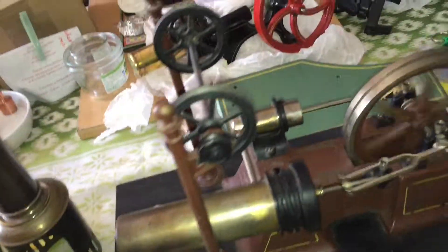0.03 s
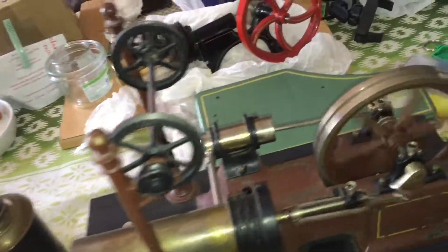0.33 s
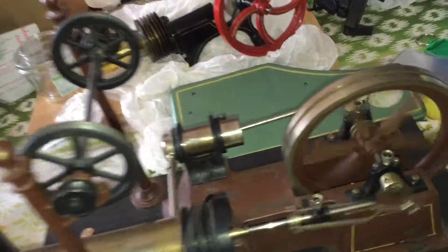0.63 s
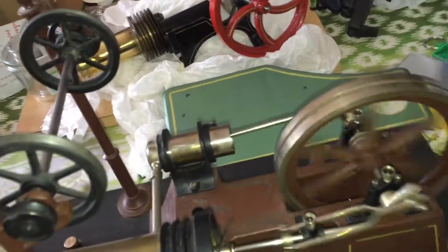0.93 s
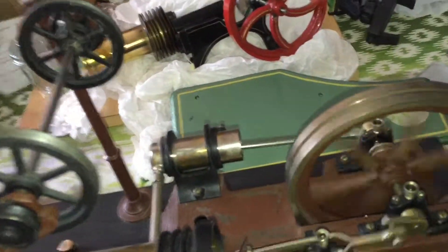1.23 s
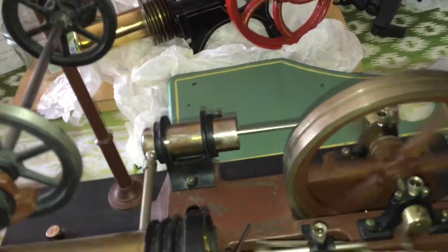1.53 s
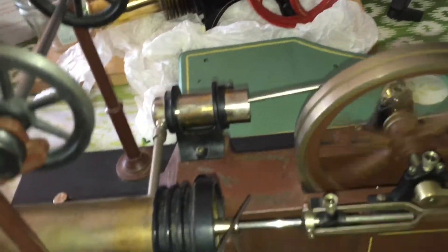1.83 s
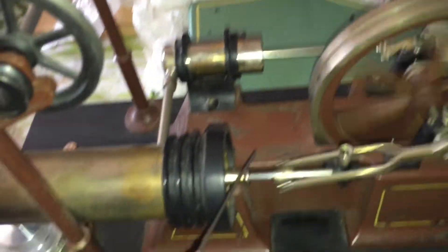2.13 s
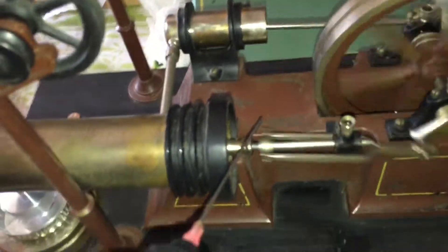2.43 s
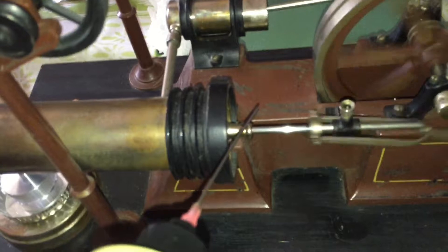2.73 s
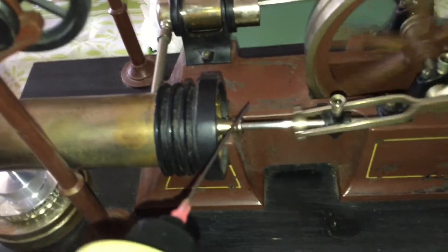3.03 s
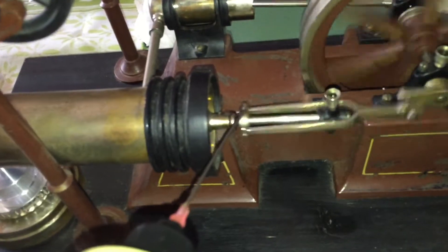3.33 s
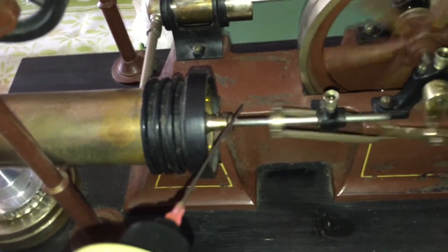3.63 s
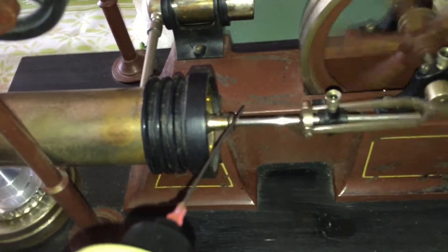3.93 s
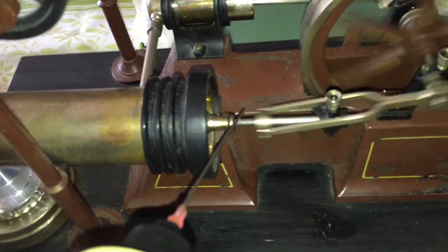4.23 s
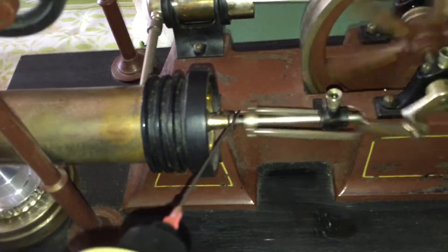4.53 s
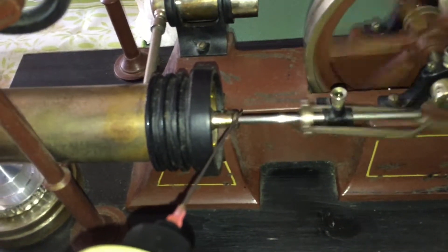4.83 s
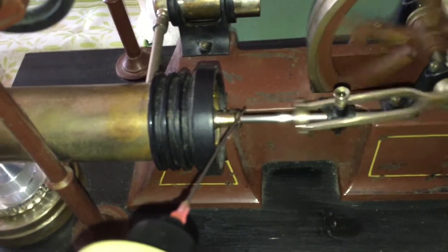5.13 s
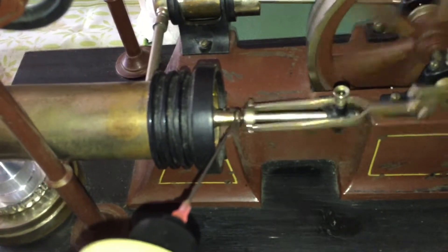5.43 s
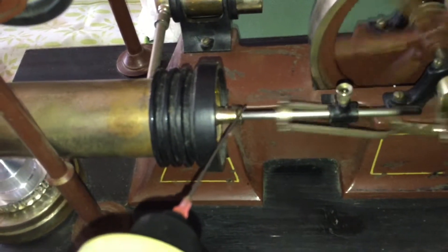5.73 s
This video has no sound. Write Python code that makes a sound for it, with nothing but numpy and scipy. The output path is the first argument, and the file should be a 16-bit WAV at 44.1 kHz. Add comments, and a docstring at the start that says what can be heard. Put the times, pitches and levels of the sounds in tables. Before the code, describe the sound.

A small model engine runs steadily indoors with sharp, rhythmic metal clacks and a faint squeak on every turn.

```python
"""Model hot air engine on a table.

Close by, indoors, at about 143 turns a minute. Linkage slack knocks twice a turn, harder on the back
stroke; each knock rattles the frame and thumps the base. A dry slide sticks and slips, squeaking once
a turn. Joints scuff and tick, bearings chirp and whisper, and one dry ping sounds near the end."""
import sys
import numpy as np
from scipy import signal
from scipy.fft import rfft, irfft
from scipy.io import wavfile
from scipy.ndimage import uniform_filter1d

SR = 44100
rng = np.random.default_rng(int(sys.argv[2]) if len(sys.argv) > 2 else 0)


def inscribe(sig):
    """Save sig as 16-bit PCM at rate SR to the path in sys.argv[1].

    A 1-D sig is mono; a 2-D sig holds one channel per row.
    Samples are clipped to [-1, 1] before scaling.
    """
    pcm = np.round(np.clip(np.atleast_2d(sig).T, -1, 1) * 32767)
    wavfile.write(sys.argv[1], SR, pcm.astype(np.int16))


N = 254456


# flywheel: (time [s], speed [turns/min])
SPEED = [(.8, 143.33), (2, 142.41), (3.9, 142.21), (4.6, 143.85)]

def flywheel(first_knock_s=.155):
    """Time and turns made since the first out knock, with a second to spare at each end."""
    t = np.arange(-SR, N + SR) / SR
    turns = np.cumsum(follow(SPEED, t)) / (60 * SR)
    return t, turns - np.interp(first_knock_s, t, turns)


# back knock after the out knock: (time [s], angle [turns])
BACK_ANGLE = [(1, .4456), (3.7, .4548), (4.5, .4559)]

def knock_times():
    """Out and back knocks each fall at their own flywheel angle."""
    t, turns = flywheel()
    whole = np.arange(-1, np.interp(N / SR, t, turns))
    outs = np.interp(whole, turns, t)
    backs = np.interp(whole + follow(BACK_ANGLE, outs), turns, t)
    return outs[1:], backs


# knock strength per stroke: (time [s], relative level [dB])
OUT_FORCE = [(.15, -34), (.57, -38.5), (1, -35), (2.25, -33.7), (3.9, -35.5), (4.4, -33.5), (5.6, -35)]
BACK_FORCE = [(.3, -32), (2, -30.3), (2.8, -31), (4.099, -29.5), (4.7, -31), (5.4, -28.8)]
# brighter as the microphone moves in: (time [s], treble gain [dB])
BRIGHTNESS = [(.5, -1.6), (2.2, -1.2), (3.3, 1.2), (4.9, 1.6), (5.6, -1.8)]
# load on the base: (time [s], thump gain [dB])
BASE_LOAD = [(.2, -1.8), (1, 0), (3.8, 1), (5.5, 0)]

def strokes(times, force, thump_db, rattle_s):
    """One row a knock: (time [s], level [dB], treble gain [dB], thump gain [dB], rattle length [s])."""
    thump_scatter, rattle_scatter = rng.standard_normal((len(times), 2)).T
    load_db = thump_db + follow(BASE_LOAD, times) + .5 * thump_scatter
    length_s = rattle_s * np.exp(.15 * rattle_scatter)
    return np.transpose([times, follow(force, times), follow(BRIGHTNESS, times), load_db, length_s])


# frame and rod modes: (frequency [Hz], t60 [s], out level [dB], back level [dB])
FRAME_MODES = [(555, .09, -28, -17), (615, .11, -25, -4), (780, .05, -5, -2), (880, .055, -3, 4),
               (935, .06, -4, -1), (997, .07, -2, -3), (1098, .08, -17, -5), (1220, .07, -9, -7),
               (1333, .07, -7, -6), (1690, .025, -8, -7), (1815, .055, -15, -4), (2340, .05, -2, 0),
               (2640, .05, -2, 2), (2865, .06, -3, 0), (3200, .035, -5, -3), (3390, .06, -2, 2),
               (3490, .05, -3, -2), (3752, .07, -9, -7), (3880, .05, -9, -8), (4480, .035, -9, -9),
               (5170, .03, -13, -11), (5390, .22, -27, -17), (6480, .022, -8, -8), (7890, .025, -12, -22),
               (9020, .025, -5, -7), (9350, .025, -7, -9), (9950, .014, -13, -3), (10750, .02, -18, -11),
               (13040, .07, -25, -22)]
# dense, damped modes between them: (frequency [Hz], out density [dB], back density [dB])
CLATTER = [(278, -37, -32.5), (530, -12.5, -8), (733, -2, 2.5), (1090, -3, 3), (1490, 1, 0),
           (2700, -0.5, 3), (3260, 0, 0), (4300, -10, -7.5), (7000, -11, -10.5), (7960, -13.5, -17),
           (9680, -11.5, -8), (11500, -21.5, -10), (12800, -17, -17.5), (15800, -42, -22)]

def knocks(rows, side, clatter_db, clatter_t60_s, touch_db, touch_lead_s, load_detune=.006):
    """A joint touches lightly, then strikes the frame; load shifts the modes. Side 0 is out, 1 back."""
    out, t = np.zeros(N), clock(.16)
    spectrum = np.array(CLATTER)[:, [0, 1 + side]]
    for s, db, treble_db, _, rattle_s in rows:
        swell = np.minimum(t / (.62 * rattle_s), 1)  # bounces pump the modes up
        scatter = rng.standard_normal((len(FRAME_MODES), 3))
        ring = np.zeros(len(t))
        for (hz, t60, *side_db), (stray_db, cycles, detune) in zip(FRAME_MODES, scatter):
            partial = mode(t + abs(cycles) / hz, hz * (1 + load_detune * detune), t60)
            ring += amp(side_db[side] + stray_db) * unit(swell * partial)
        dense = colour(rng.standard_normal(len(t)) * decay(t, clatter_t60_s), spectrum)
        clatter = unit(signal.fftconvolve(dense, rattle(rattle_s, bounces=9))[:len(t)])
        blow = unit(unit(ring) + amp(clatter_db) * clatter)
        blow = colour(blow, [(3800, 0), (7000, treble_db)]) * np.sqrt(.013 * SR)
        add(out, s, amp(db + 1) * blow)
        touch = signal.fftconvolve(dense, rattle(touch_lead_s, bounces=14))
        touch = colour(touch, [(900, -7.5), (2300, -3), (4000, -5), (10000, -9)])
        add(out, s - touch_lead_s, amp(db + touch_db) * unit(touch) * np.sqrt(.017 * SR))
    return out


def rattle(length_s, bounces):
    """Force of a joint chattering home: one blow, then scattered bounces."""
    force = np.zeros(len(clock(length_s)))
    at = rng.integers(0, len(force), bounces)
    force[at] = rng.standard_normal(bounces) * (1 - .5 * at / len(force))
    force[0] = 1.29
    return force


# rubs around the knock: (delay [s], gain [dB], decay time [s], brightness [dB])
BACK_SCUFFS = [(-.03, -27.5, 0.017, -4), (0.079, -28.5, 0.017, 4.5)]

def back_stroke(rows):
    """The harder knock, with a clear first touch."""
    blows = knocks(rows, side=1, clatter_db=2.5, clatter_t60_s=.04, touch_db=-14.5, touch_lead_s=.0087)
    return blows + scuffs(rows, BACK_SCUFFS)


# slack take-up: (time [s], relative level [dB])
SLACK_LEVEL = [(.3, -50), (1.8, -42), (3.05, -41), (3.5, -46.3), (5.15, -49), (5.57, -40.5)]
# its rubs: (delay [s], gain [dB], decay time [s], brightness [dB])
OUT_SCUFFS = [(0, -7, 0.0091, 1), (.006, -4.5, 0.012, -4), (0.021, -18, .016, 4.5), (.032, -12, 0.013, 3.5)]

def out_stroke(rows, slack_lead_s=.0432):
    """The rod scuffs as it takes up its slack, then gives the lighter knock."""
    blows = knocks(rows, side=0, clatter_db=1.5, clatter_t60_s=.026, touch_db=-21, touch_lead_s=.005)
    slack_s = rows[:, 0] - slack_lead_s
    return blows + scuffs(zip(slack_s, follow(SLACK_LEVEL, slack_s)), OUT_SCUFFS)


# base and table modes: (frequency [Hz], t60 [s], level [dB])
BASE_MODES = [(88, 0.058, -11.5), (146.8, 0.16, -1.2), (159.9, 0.11, -1.5), (188, .15, -0.35),
              (299.7, 0.049, 7.5), (367.5, 0.11, 7.5), (388.3, 0.098, 5.5)]
# pushes on the base: (delay [s], relative level [dB], contact time [s])
OUT_PUSHES = [(-.0412, -44, 0.0045), (-.0147, -42, 0.0046), (-.0005, -45.5, 0.002), (.006, -47.5, 0.0007)]
BACK_PUSHES = [(-.0187, -61, 0.0032), (-.0027, -41.5, .0036), (.0065, -48.5, 0.0015), (0.025, -48.5, 0.004),
               (0.047, -50.5, .0048)]

def thumps(rows, pushes, jitter_s=.00023, attack_s=.0031):
    """Moving parts push on the base and ring it; longer contact gives a duller thump."""
    force, t = np.zeros(N), clock(.3)
    for s, _, _, load_db, _ in rows:
        for delay_s, db, contact_s in pushes:
            push = np.hanning(len(clock(contact_s)))
            start_s = s + delay_s + jitter_s * rng.standard_normal()
            add(force, start_s, amp(db + load_db + rng.standard_normal()) * push / push.sum())
    ring = sum(amp(db) * mode(t, hz, t60) for hz, t60, db in BASE_MODES)
    ring *= 1 - np.exp(-t / attack_s)
    ring = signal.lfilter(*signal.butter(2, 80, "high", fs=SR), ring)  # the thumps carry little below 80 Hz
    return signal.fftconvolve(force, ring)[:N]


# joint friction: (frequency [Hz], density [dB])
SCUFF_SPECTRUM = [(300, -6), (600, -4.5), (760, 1), (900, 16), (1020, 0.5), (1150, -8), (2200, -7.5),
                  (2450, -3), (2680, 10), (2950, -5), (3400, -5), (4200, -7), (5000, -19), (15000, -27.5)]

def scuffs(rows, contacts, slips_per_s=3500, jitter_s=.0013):
    """Joints rub in short, grainy bursts of tiny slips."""
    out = np.zeros(N)
    for s, db, *_ in rows:
        for delay_s, rub_db, decay_s, bright_db in contacts:
            u = clock(3 * decay_s) / decay_s
            slips = rng.standard_normal(len(u)) * (rng.random(len(u)) < slips_per_s / SR)
            rub = colour(slips * np.minimum(u / .23, 1) * np.exp(-u ** 2), SCUFF_SPECTRUM)
            rub = colour(rub, [(1100, 0), (2600, bright_db), (6000, 2.6 * bright_db)])
            start_s = s + delay_s + jitter_s * rng.standard_normal()
            add(out, start_s, amp(db + rub_db) * unit(rub) * np.sqrt(.5 * decay_s * SR))
    return out


# slide friction: (time [s], relative level [dB], starting pitch [Hz])
SLIDE_GRIP = [(.3, -58.5, 2790), (.85, -55.5, 2650), (2.6, -55.5, 2635), (5.5, -56.3, 2715)]

def squeaks(backs, delay_s=.0775, attack_s=.005, release_s=.013, gain_db=-2, rise=.058):
    """The dry slide sticks and slips; pitch steps up as the grip eases, and the octave comes in late."""
    out, t = np.zeros(N), clock(.044)
    flare_db = 7.5 * np.exp(-((t - .011) / .0043) ** 2)
    envelope = np.minimum(t / attack_s, 1) * np.minimum((t[-1] - t) / release_s, 1) * amp(flare_db)
    bend = 1 + rise * (1 + np.tanh((t - .0211) / .0074)) / 2
    octave = amp(-17) * (2 * t / t[-1]) ** 2
    for s in backs + delay_s:
        hz = follow(SLIDE_GRIP, s, column=2) * bend ** rng.uniform(.6, 1.15)
        phase = slip_phase(hz, waver=.028)
        grip_db = follow(SLIDE_GRIP, s) + 2.5 * wander(len(t), size=90)
        tone = np.sin(phase) + octave * np.sin(2 * phase)
        add(out, s, np.sqrt(2) * amp(gain_db + grip_db) * envelope * tone)
    return out


def slide_whines(outs, delay_s, length_s, start_hz, end_hz, level_db):
    """The slide sings softly elsewhere in the turn, its grip uneven."""
    out, t = np.zeros(N), clock(length_s)
    for s in outs:
        tone = np.sin(slip_phase(np.linspace(start_hz, end_hz, len(t)), waver=.03))
        grip_db = 2 * rng.standard_normal() + 2 * wander(len(t), size=90)
        add(out, s + delay_s, amp(level_db + grip_db) * np.hanning(len(t)) * tone)
    return out


def slip_phase(hz, waver):
    """Phase of a stick-slip tone with wavering pitch."""
    return 2 * np.pi * np.cumsum(hz * (1 + waver * wander(len(hz), size=60))) / SR


# bearing chirps: (turn [index], relative level [dB], length [s])
CHIRPS = [(3, -67, .012), (6, -64, .012), (8, -70, .012), (11, -62, .014), (13, -55.5, .03)]

def bearing_chirps(outs, delay_s=.126, gain_db=3):
    """A bearing chirps on some turns, sagging in pitch."""
    out, t = np.zeros(N), clock(.05)
    hz = 9650 + 500 * np.exp(-(t / .009) ** 2)
    for turn, db, length_s in CHIRPS:
        u = t / length_s
        envelope = np.minimum(u / .19, 1) * np.exp(-3 * u ** 2)
        tone = np.sin(slip_phase(hz, waver=.006))
        add(out, outs[turn] + delay_s, amp(db + gain_db) * envelope * tone)
    return out


# joint ticks: (turn [index], relative level [dB])
TICKS = [(3, -70), (6, -70), (8, -64), (11, -59), (13, -62)]

def joint_ticks(outs, delay_s=.083, gain_db=5, bounce_s=.01, bounce_db=-4):
    """A loose joint ticks on some turns and bounces once."""
    out, t = np.zeros(N), clock(.05)
    spectrum = [(1000, -1), (8500, -11), (9300, 5), (10300, -16), (12200, 0), (14000, -23)]
    for turn, db in TICKS:
        for bounce in range(2):
            tick = amp(db + gain_db + bounce * bounce_db) * noise(spectrum, len(t)) * np.exp(-t / .0035)
            add(out, outs[turn] + delay_s + bounce * bounce_s, tick)
    return out


# light metal ping: (time [s], level [dB], frequency [Hz], t60 [s])
PING = (5.5308, -35, 1900, .022)

def ping():
    """One close, dry snap of metal with a short ring."""
    out, t = np.zeros(N), clock(.038)
    s, db, hz, t60 = PING
    ring = mode(t, hz, t60) * np.minimum(t / .002, 1)
    snap = noise([(300, -20), (700, 0), (3300, 0), (6000, -6), (14000, -9)], len(t))
    snap *= np.exp(-(t / .003) ** 2)
    add(out, s, amp(db) * (ring / ring.max() + amp(-13) * snap))
    return out


def bearing_whisper(level_db=-73, peak_turn=.69):
    """Shafts rub in their bearings, most strongly after the back stroke."""
    turns = np.interp(np.arange(N) / SR, *flywheel())
    load_db = 5 * np.cos(2 * np.pi * (turns - peak_turn))
    spectrum = [(300, -24), (600, 7), (750, -7), (970, 12.5), (1200, -5), (2100, -2), (2700, 4.5),
                (3600, -8.5), (6000, -12), (15000, -21.5)]
    return amp(level_db + load_db) * noise(spectrum, N)


# reverberation: (frequency [Hz], level [dB], t60 [s])
ROOM = [(150, -5.5, 0.092), (443, -3, 0.23), (575, -2, 0.23), (854, -14.5, 0.17), (1330, -1.5, 0.17),
        (1860, -7.5, 0.21), (2430, -10, 0.17), (3680, -20.5, 0.26), (5580, -8, 0.19), (9900, -18, 0.22),
        (15000, -15.5, 0.29)]

def room(x, patterns=4, build_s=.019, drift_s=1.117):
    """Dense reflections; their pattern drifts as the parts move."""
    out, t, table = np.zeros(N), clock(.4), np.array(ROOM)
    for k in range(patterns):
        hz, frame_s, bands = signal.stft(rng.standard_normal(len(t)), SR, nperseg=256)
        t60 = read(table[:, [0, 2]], hz)[:, None]
        gain = amp(read(table[:, :2], hz))[:, None] * np.sqrt(2 * np.log(1000) / t60 / SR)
        tail = signal.istft(bands * gain * decay(frame_s, t60), SR, nperseg=256)[1][:len(t)]
        tail *= np.minimum(t / build_s, 1)
        share = np.cos(np.pi * (np.arange(N) / SR / drift_s + k / patterns)) * np.sqrt(2 / patterns)
        out += signal.fftconvolve(x * share, tail)[:N]
    return out


# still room: (frequency [Hz], density [dB])
AIR_SPECTRUM = [(15, -54), (25, -2.5), (82, -1.5), (140, 1), (267, -7.5), (368, -5.5), (482, -17),
                (919, -16), (2010, -14.5), (2700, -18), (3630, -18), (9550, -23.5), (15500, -26)]

def air(level_db=-68.5):
    """Steady, faint room noise."""
    return amp(level_db) * noise(AIR_SPECTRUM, N)


def amp(db):
    """Decibels to gain."""
    return 10 ** (np.asarray(db) / 20)


def clock(seconds):
    """Sample times of a short sound."""
    return np.arange(max(int(seconds * SR), 8)) / SR


def unit(x):
    """Scales to unit energy."""
    return x / np.sqrt(np.sum(x ** 2) + 1e-20)


def decay(t, t60):
    """Envelope falling 60 dB in t60 seconds."""
    return np.exp(-np.log(1000) * t / t60)


def mode(t, hz, t60):
    """Damped sine."""
    return np.sin(2 * np.pi * hz * t) * decay(t, t60)


def follow(curve, s, column=1):
    """Reads a control curve at time s."""
    table = np.array(curve)
    return np.interp(s, table[:, 0], table[:, column])


def read(points, hz):
    """Reads a spectrum on a log-frequency axis."""
    f, value = np.transpose(points)
    return np.interp(np.log(hz + 1), np.log(f), value)


def add(mix, s, sound):
    """Mixes a sound in at time s."""
    start = round(s * SR)
    part = mix[max(start, 0):][:max(len(sound) + min(start, 0), 0)]
    part += sound[max(-start, 0):][:len(part)]


def colour(x, points, size=4096):
    """Minimum-phase filter through points (frequency [Hz], gain [dB])."""
    log_gain = np.log(amp(read(points, abs(np.fft.fftfreq(size, 1 / SR)))))
    taps = np.fft.ifft(np.exp(np.conj(signal.hilbert(log_gain)))).real
    return signal.fftconvolve(x, taps[:size // 2])[:len(x)]


def noise(points, count):
    """Unit-rms noise shaped by points (frequency [Hz], density [dB])."""
    gain = amp(read(points, np.fft.rfftfreq(count, 1 / SR)))
    return unit(irfft(rfft(rng.standard_normal(count)) * gain, count)) * np.sqrt(count)


def wander(count, size):
    """Unit-rms noise smoothed over size samples."""
    return unit(uniform_filter1d(rng.standard_normal(count), size)) * np.sqrt(count)


def scene():
    """Engine, room and still air, in mono."""
    outs, backs = knock_times()
    out_knocks = strokes(outs, OUT_FORCE, thump_db=-.6, rattle_s=.0036)
    back_knocks = strokes(backs, BACK_FORCE, thump_db=.57, rattle_s=.005)
    metal = out_stroke(out_knocks) + back_stroke(back_knocks) + squeaks(backs)
    metal += bearing_chirps(outs) + joint_ticks(outs) + bearing_whisper()
    metal += slide_whines(outs, delay_s=.016, length_s=.048, start_hz=2790, end_hz=2630, level_db=-53.5)
    metal += slide_whines(outs, delay_s=-.043, length_s=.019, start_hz=2710, end_hz=2650, level_db=-63.5)
    metal += slide_whines(outs, delay_s=-.08, length_s=.019, start_hz=2575, end_hz=2710, level_db=-66)
    base = thumps(out_knocks, OUT_PUSHES) + thumps(back_knocks, BACK_PUSHES)
    reflections = room(metal + amp(-7) * base)
    return (metal + base + reflections + ping() + air())[None]


def record(dry, cutoff_hz=15700):
    """Steep low-pass band limit."""
    taps = signal.firwin(255, cutoff_hz, window=("kaiser", 9), fs=SR)
    return signal.oaconvolve(dry, taps[None], "same")


dry = scene()
out = record(dry)
inscribe(out)
```